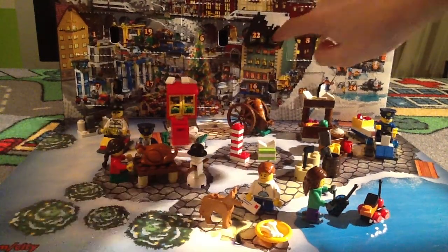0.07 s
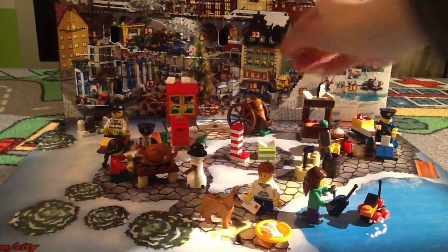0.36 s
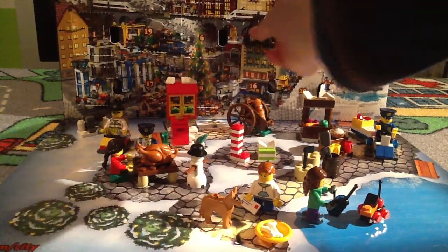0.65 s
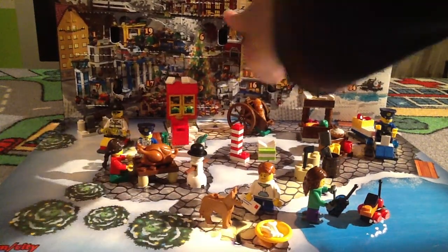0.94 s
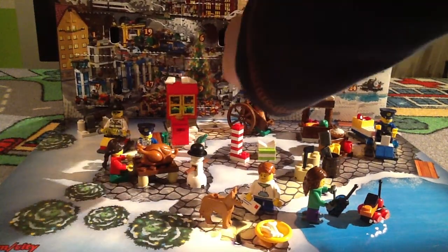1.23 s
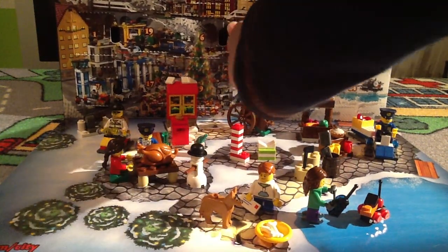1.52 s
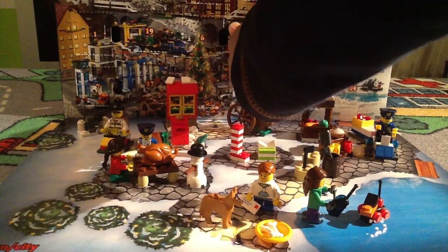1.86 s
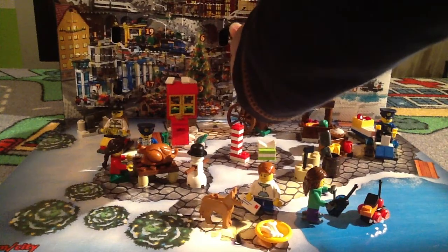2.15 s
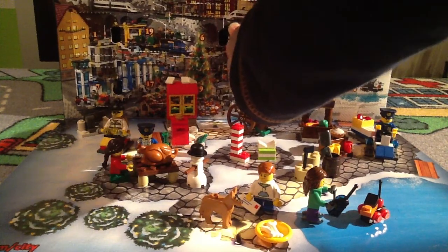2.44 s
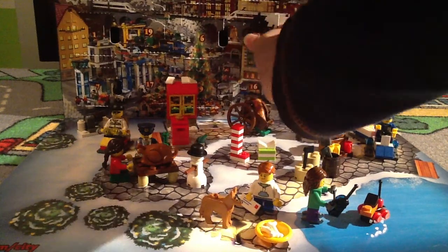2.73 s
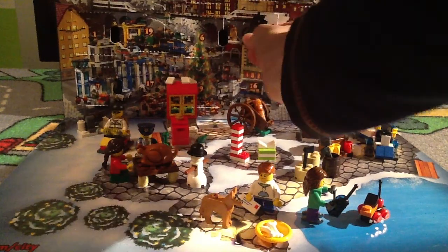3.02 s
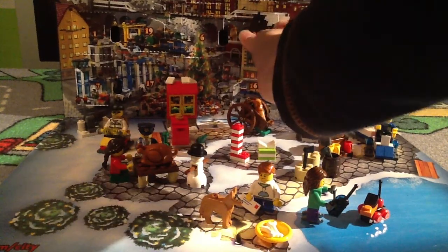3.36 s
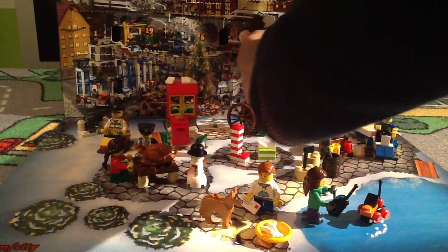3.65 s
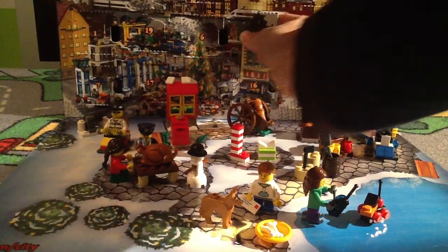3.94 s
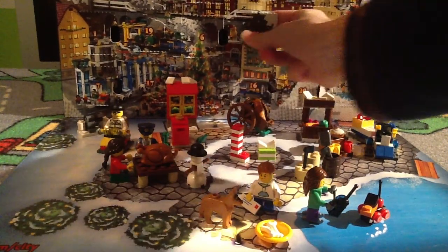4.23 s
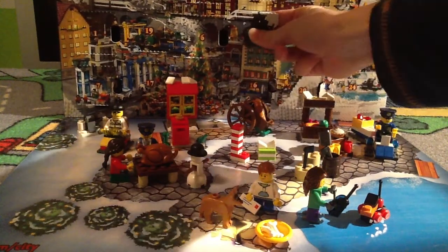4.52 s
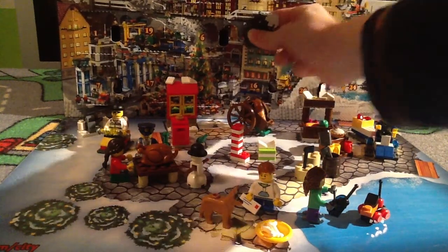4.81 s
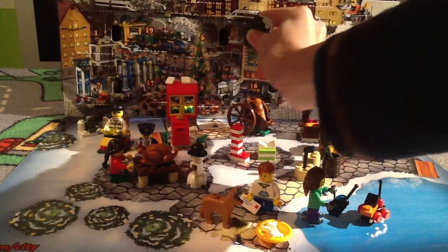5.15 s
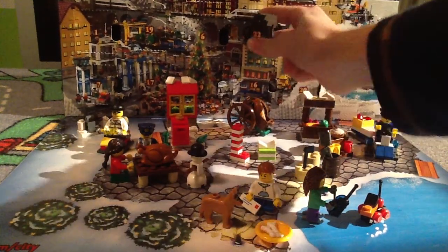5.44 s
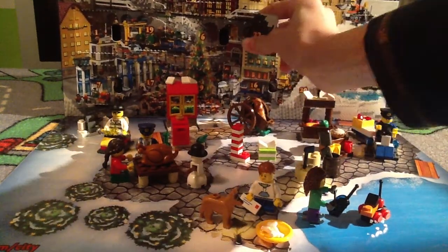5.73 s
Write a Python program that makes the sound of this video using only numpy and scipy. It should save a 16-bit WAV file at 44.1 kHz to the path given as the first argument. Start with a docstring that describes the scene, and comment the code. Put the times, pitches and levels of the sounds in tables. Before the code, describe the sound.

Fingers push in and tear open a perforated cardboard door, with sharp snaps, soft rubbing and faint crinkles in a small room.

```python
"""Card bridges snap one by one as fingers push in and pull open a perforated door of a cardboard calendar.
Each snap cracks, rings the stiff panel and rocks the box; card that holds springs back with a duller knock.
In between, fingertips and torn edges rub, snag and creak, and the handled card crinkles.
The calendar stands on the floor of a small room, which answers briefly over a faint hiss."""
import sys
import numpy as np
from scipy import signal
from scipy.fft import rfft, irfft
from scipy.io import wavfile

SR = 44100
rng = np.random.default_rng(int(sys.argv[2]) if len(sys.argv) > 2 else 0)


def generate_wav(signal):
    """Clip the signal to [-1, 1] and save it as 16-bit WAV at the path in sys.argv[1]."""
    frames = np.transpose(np.atleast_2d(signal))
    scaled = np.clip(frames, -1, 1) * 32767
    pcm = np.round(scaled).astype(np.int16)
    wavfile.write(sys.argv[1], SR, pcm)


N = 259308

# Strokes of fingers and torn edges on the card. Each row: start and end in seconds,
# base level in dB, brightness in dB (lifts the scratch and the crack of the snags).
STROKES = [(0, 0.07, -61.5, -6), (0.104, 0.199, -57.5, -8), (0.654, 0.887, -64, -9),
           (1.528, 1.643, -67.5, -7), (1.788, 1.956, -67.5, -5), (2.02, 2.16, -68, -2.5),
           (2.799, 2.936, -59.5, -11.5), (2.919, 2.975, -47.5, -12.5), (3.087, 3.208, -54.5, -19),
           (3.179, 3.294, -59, -5), (3.924, 4.054, -59.5, -18.5), (4.04, 4.114, -51.5, -3),
           (4.123, 4.216, -58, 1.5), (4.581, 4.876, -68, -4.5), (4.893, 4.959, -47, -6.5),
           (5.57, 5.765, -64.5, -8.5)]


def undb(db):
    """Decibels to gain."""
    return 10 ** (np.asarray(db) / 20)


def rms(x):
    """Root mean square."""
    return np.sqrt(np.mean(x ** 2) + 1e-20)


def band(x, lo_hz, hi_hz, order=2):
    """Causal band-pass."""
    sos = signal.butter(order, [lo_hz, min(hi_hz, .45 * SR)], "band", fs=SR, output="sos")
    return signal.sosfilt(sos, x)


def colour(x, points):
    """EQ a sound along a curve of (Hz, dB) points."""
    hz, db = np.transpose(points)
    f = np.maximum(np.fft.rfftfreq(len(x), 1 / SR), 1)
    return irfft(rfft(x) * undb(np.interp(np.log(f), np.log(hz), db)), len(x))


def fade(t, t60):
    """Exponential decay, silent before t = 0."""
    return (t >= 0) * undb(-60 * np.maximum(t, 0) / t60)


def add(out, start_s, x):
    """Mix x into out from a given time."""
    i = max(int(start_s * SR), 0)
    out[i:i + len(x)] += x[:max(N - i, 0)]


def catches(length, per_s, spread_db):
    """Random clicks of either sign; a positive spread makes a few stand out from the rest."""
    luck, size, side = rng.random((SR // 2, 3))[:length].T
    return (luck < per_s / SR) * undb(-spread_db * np.log(size + .01)) * np.sign(side - .5)


def hiss(level_db=-66):
    """A steady, faint bed of still air and microphone hiss."""
    # Tone of the hiss. Each row: frequency in Hz, relative level in dB.
    hiss_eq = [(18, -42.5), (30, -20), (97, -7), (202, 2), (270, 1), (606, -3.5), (996, -10.5),
               (1230, -10.5), (1550, -10), (1970, -11), (3230, -13), (5590, -12.5), (14000, -13.5),
               (15500, -15.5)]
    x = colour(rng.standard_normal(N), hiss_eq)
    return undb(level_db) * x / rms(x)


def room(x, predelay_s=0.0071, build_s=0.0071):
    """Diffuse echoes of a furnished room, built octave by octave; the lows linger longest."""
    # The room's reverb. Each row: frequency in Hz, level in dB, seconds to decay by 60 dB.
    reverb = [(98.34, 1, 0.48), (250, -7, 0.32), (505, -7.5, 0.27), (1000, -10, 0.27), (2000, -11, 0.27),
              (3935, -14, 0.26), (8050, -11.5, 0.25), (15000, -8.5, .22)]
    hz, db, t60 = np.transpose(reverb)
    t = np.arange(int(.7 * SR)) / SR
    f, noise = np.fft.rfftfreq(len(t), 1 / SR), rfft(rng.standard_normal(len(t)))
    onset = np.clip((t - predelay_s) / build_s, 0, 1)
    response = 0
    for centre in 2. ** np.arange(5, 15):
        octave = (f >= centre / np.sqrt(2)) & (f < centre * np.sqrt(2))
        decay = onset * fade(t, np.interp(np.log(centre), np.log(hz), t60))
        gain = undb(np.interp(np.log(centre), np.log(hz), db))
        response += gain * irfft(noise * octave, len(t)) * decay / np.sqrt(np.sum(decay ** 2))
    return signal.fftconvolve(x, response)[:N]


def crinkling(count=14, level_db=-69, spread_db=2.5):
    """The handled card ticks faintly at uneven intervals."""
    out = np.zeros(N)
    for k, (when, size) in enumerate(rng.random((count, 2))):
        tick = snap(level_db + spread_db * (2 * size - 1), flex_db=4.5, crack_db=-7, tick_db=-2)
        add(out, (k + when) / count * N / SR, tick)
    return out


def creaking(slips_per_s=700, spread_db=3, half_width=0.093):
    """A quick run of slips rings one small patch of the card."""
    # Creaks of skin and card on card. Each row: start and length in seconds, resonance in Hz,
    # its level in dB, the octave above in dB relative to it.
    creaks = [(0.422, 0.023, 1850, -68.5, -17), (1.333, 0.01, 940, -60.5, -24),
              (1.561, 0.044, 660, -65.5, -6), (1.846, 0.087, 2030, -71.5, -1),
              (5.688, 0.012, 1524, -49, -13.5)]
    out = np.zeros(N)
    for start, length, hz, db, octave_db in creaks:
        swell = np.sqrt(np.hanning(int(length * SR)))
        grit = rng.standard_normal(SR // 4)[:len(swell)]
        slips = swell * (catches(len(swell), slips_per_s, spread_db) + 0.058 * grit)
        for centre, level_db in (hz, db), (2 * hz, db + octave_db):
            ring = band(np.pad(slips, (0, SR // 50)), centre * (1 - half_width), centre * (1 + half_width))
            add(out, start, undb(level_db) * ring / rms(ring[:len(swell)]))
    return out


def rubbing(slips_per_s=1100, spread_db=-0.5, body_db=-3, scratch_db=-4, ramp_s=0.027):
    """Stick and slip: dense uneven catches drum the panel and scratch its fibres."""
    # Body of the card, its modes blurred by sliding. Each row: frequency in Hz, relative level in dB.
    body_eq = [(50, -27.5), (130, -4), (250, -1), (450, 2), (800, -1.5), (1200, -6.5), (1800, -21),
               (4000, -41), (10000, -58)]
    # Scratch of loose fibres. Each row: frequency in Hz, relative level in dB.
    scratch_eq = [(500, -20), (1500, 2), (2600, 2), (4500, 0.5), (8000, -6), (15000, -11)]
    out, t = np.zeros(N), np.arange(SR // 2) / SR
    for start, end, db, bright_db in STROKES:
        length = end - start
        pressure = np.clip(np.minimum(t, length - t) / ramp_s, 0, 1)
        slips = catches(len(t), slips_per_s, spread_db) * pressure
        for eq, level_db in (body_eq, db + body_db), (scratch_eq, db + bright_db + scratch_db):
            layer = colour(slips, eq)
            add(out, start, undb(level_db) * layer / rms(layer[t < length]))
    return out


def snagging(per_stroke=2, snag_db=-4.5, spread_db=2.5):
    """A sliding finger or edge snags and lets go; the harder the stroke, the louder the tick."""
    out = np.zeros(N)
    for start, end, db, bright_db in STROKES:
        for k, (when, size) in enumerate(rng.random((per_stroke, 2))):
            level_db = db + snag_db + spread_db * (2 * size - 1)
            tick = snap(level_db, flex_db=1, crack_db=bright_db + 1, tick_db=-2)
            add(out, start + (end - start) * (k + when) / per_stroke, tick)
    return out


def fraying(fibres_per_s=3000, t60=0.21):
    """After a snap the last fibres let go one by one."""
    t = np.arange(SR // 6) / SR
    crackle = band(catches(len(t), fibres_per_s, spread_db=2.5), 1400, 3600, order=1)
    return crackle / rms(crackle) * fade(t, t60)


def panel_ring(t, scatter_db=1.5, detune=0.023, lag_s=.001):
    """The panel rings, its modes varied at random as the stress and the grip differ for each snap."""
    # Modes of the panel and the box behind it. Each row: frequency in Hz, relative level in dB,
    # seconds to decay by 60 dB.
    modes = [(117, -13, 0.035), (227.5, -5.5, 0.0086), (323, 0.5, 0.049), (435.7, -4, 0.04),
             (503.4, 5.5, 0.037), (553, -5.5, 0.099), (663, -10, 0.05), (685.3, -8.5, 0.1),
             (760, -1, 0.021), (896, 1, 0.058), (982, 7.5, 0.019), (1090, 3.5, 0.02), (1187, -1, 0.031),
             (1260, 3.5, 0.027), (1413, -4, 0.026), (1556, 0.5, .018), (1794, 3, 0.013), (2090, 0, 0.011),
             (2440, -1, 0.013), (2775, -0.5, 0.02), (3038, 0, 0.014), (3850, -9.5, 0.0094),
             (4540, -2.5, 0.014), (6230, 3.5, 0.0059), (7015, 5.5, 0.0047), (9000, -4.5, 0.0052)]
    hz, db, t60 = np.transpose(modes)[:, :, None]
    weight, bend, phase = rng.standard_normal((len(modes), 3)).T[:, :, None]
    # bending waves are slower at low pitch, so the lows arrive late
    age = t - lag_s * hz[3] / hz
    swing = np.sin(2 * np.pi * hz * (1 + detune * bend) * age + .5 * phase)
    return np.sum(undb(db + scatter_db * weight) * fade(age, t60) * swing, axis=0)


def snap(panel_db, flex_db, crack_db, tick_db, fibre_t60=0.016, grain_db=4.5, rise_s=.0003, echo_s=.0027):
    """Card gives way: one sharp break, a burst of parting fibres, the ring of the panel."""
    # The card's four registers: flex, panel, crack, fibre tick. Each row: low and high edge in Hz.
    registers = [(185, 580), (660, 1600), (1600, 5000), (5000, 13000)]
    t = np.arange(SR // 8) / SR
    noise, grain = rng.standard_normal((2, len(t)))
    fibres = undb(3) * noise * undb(grain_db * grain) * fade(t, fibre_t60)
    click = undb(13) * fade(t, 0.001)
    # the split takes a moment to run through the card
    direct = (panel_ring(t) + fibres + click) * (1 - np.exp(-t / rise_s))
    floor_echo = 0.27 * np.interp(t - echo_s, t, direct, left=0)
    parts = [band(direct + floor_echo, lo, hi, order=3) for lo, hi in registers]
    levels = panel_db + np.array([flex_db, 0, crack_db, crack_db + tick_db])
    attack = int(.009 * SR)  # each register is levelled on its first 9 ms
    return sum(undb(db) * part / rms(part[:attack]) for db, part in zip(levels, parts))


def tearing(break_db=-34, fray_db=-14, rock_db=-30, rock_hz=105, held_boost_db=10.5, rebound_s=0.0105):
    """Each snap frays the edge and rocks the box; card pushed too gently to break springs back."""
    # Snaps and creases of the card. Each row: start in seconds, panel level in dB, flex and crack
    # in dB relative to the panel, fibre tick in dB relative to the crack.
    snaps = [(0.134, -46.5, -6.5, -8.5, -8), (0.466, -52, 1, -9, -8), (0.6125, -44, 0.5, -12.5, -12),
             (0.621, -48.5, 7.5, -5.5, -17), (1.121, -60, 4, -4.5, 1), (2.1, -50, -6.5, -4.5, -2.5),
             (2.205, -63.5, 6.5, -14, 1), (2.2852, -15.5, -9, -7.5, -8.5), (2.3039, -33.5, 2, 1, -3),
             (2.3232, -16.5, -12, -3.5, -7), (2.3322, -23, -2.5, 0.5, -7.5), (2.3623, -22, -5.5, 0.5, -15),
             (2.4846, -37.5, -3.5, -2.5, -9), (2.5625, -47, -3.5, -7.5, -2),
             (2.6177, -45.5, -10, -6.5, -13.5), (3, -49, -16.5, 0.5, -7.5), (3.047, -57.5, 1.5, -8.5, -8),
             (3.172, -40.5, 0, -3, -14.5), (3.191, -47, 3.5, 0, -6.5), (3.275, -50.5, -4.5, -11.5, -6),
             (3.454, -30.5, -2, -15.5, -4.5), (3.6004, -16.5, -8.5, -8.5, -11),
             (3.6158, -18.5, -7, -5, -3.5), (3.6418, -15.5, -13.5, -9.5, -4.5), (3.6517, -17, -9.5, -2, -8),
             (3.945, -55.5, -4.5, -8.5, 2.5), (4.0187, -56, 0.5, -6, -3), (4.0454, -48, 1.5, -3, -5),
             (4.0818, -45, -16, -4, -3.5), (4.152, -44, -17, -10, -10), (4.1693, -55.5, -10.5, 4.5, 3.5),
             (4.3385, -44.5, 4, -8, -9.5), (4.6157, -55.5, 1.5, -2, -11.5), (4.636, -49, 0.5, -10.5, -3),
             (4.8956, -38.5, 2.5, -2.5, -4.5), (4.9265, -48, -7.5, 1.5, -21),
             (4.956, -31.5, -2, -7.5, -0.5), (5.3316, -48, 3, -1, -9), (5.4447, -59, -1.5, -4, -2),
             (5.695, -51.5, 0, -12, -12.5), (5.865, -19, -5, -5.5, -1.5)]
    out, t = np.zeros(N), np.arange(SR // 8) / SR
    rock = np.sin(2 * np.pi * rock_hz * t) * fade(t, t60=0.085)
    for start, panel_db, flex_db, crack_db, tick_db in snaps:
        holds = panel_db < break_db
        add(out, start, snap(panel_db, flex_db, crack_db, tick_db))
        add(out, start, undb(panel_db + crack_db + fray_db) * fraying())
        # card that holds passes more of the push on to the box
        add(out, start, undb(panel_db + flex_db + rock_db + holds * held_boost_db) * rock)
        if holds:
            dull_knock = snap(panel_db - 12.5, flex_db=7, crack_db=-5, tick_db=-7)
            add(out, start + rebound_s, dull_knock)
    return out


def scene():
    """The card, its room and the hiss, in mono."""
    card = tearing() + crinkling() + rubbing() + snagging() + creaking()
    return (card + room(card) + hiss())[None]


def record(dry, ceiling=.7, low_hz=55, top_hz=15300):
    """The microphone rounds the hardest peaks and drops the deep bass; the top is cut."""
    rounded = ceiling * np.tanh(dry / ceiling)
    low_cut = signal.butter(2, low_hz, "high", fs=SR, output="sos")
    high_cut = signal.ellip(10, .2, 70, top_hz, fs=SR, output="sos")
    return signal.sosfilt(high_cut, signal.sosfilt(low_cut, rounded))


dry = scene()
out = record(dry)
generate_wav(out)
```